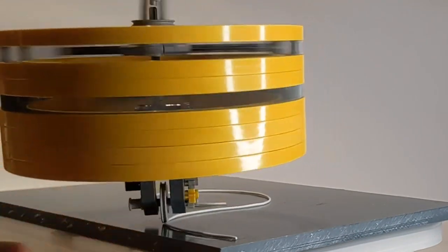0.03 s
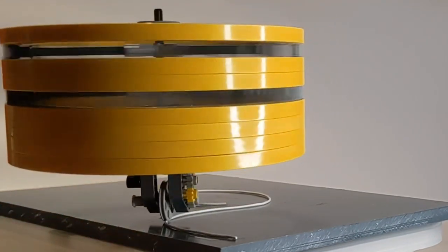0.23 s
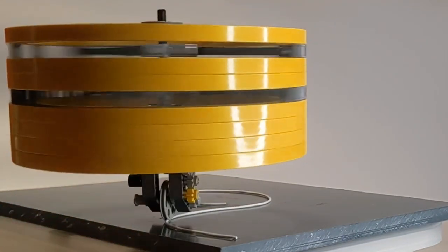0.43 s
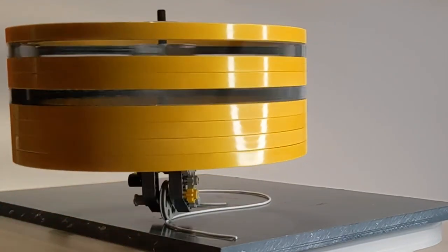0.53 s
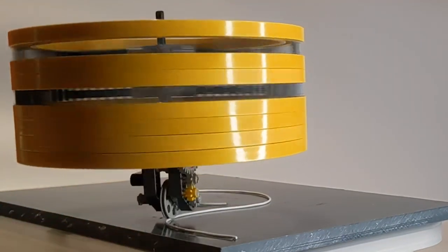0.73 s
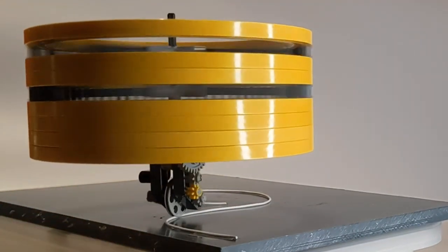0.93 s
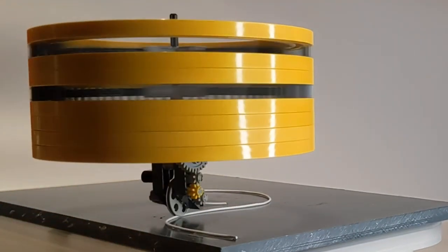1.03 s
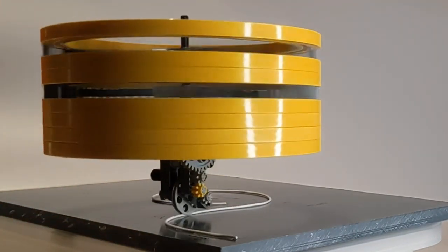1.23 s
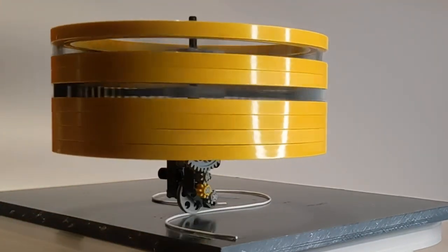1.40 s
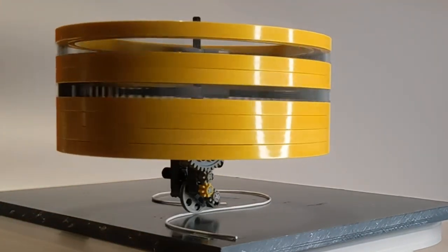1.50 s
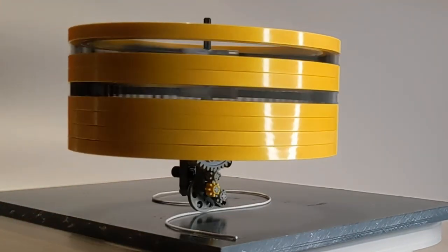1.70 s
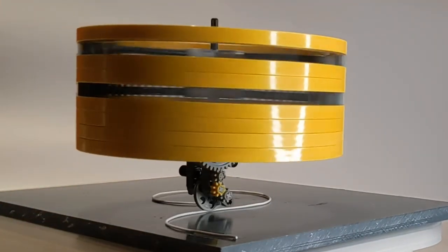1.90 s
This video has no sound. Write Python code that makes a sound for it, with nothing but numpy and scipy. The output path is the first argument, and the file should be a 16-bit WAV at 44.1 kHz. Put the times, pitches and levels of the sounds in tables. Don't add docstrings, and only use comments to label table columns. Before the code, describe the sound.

Close stereo pickup of a geared spinning toy, slightly left: faint hum, sudden sharp snap, dense gear chatter with hard clacks and dull board bumps, then a quick slowdown into tiny dry ticks in a quiet room.

```python
import sys
import numpy as np
from scipy import signal
from scipy.fft import rfft, irfft, next_fast_len
from scipy.io import wavfile
from scipy.ndimage import uniform_filter1d, map_coordinates

SR = 44100
rng = np.random.default_rng(int(sys.argv[2]) if len(sys.argv) > 2 else 0)


def pcm_store(signal):
    levels = np.round(np.clip(np.atleast_2d(signal), -1, 1) * 32767)
    wavfile.write(sys.argv[1], SR, levels.astype(np.int16).T)


def magnitude_from_level(level_db):
    exponent = np.asarray(level_db, float) / 20
    return 10 ** exponent


N = 85995
T = np.arange(N) / SR


def evened(x):
    return x / np.sqrt(np.mean(x ** 2) + 1e-20)


def read(points, hz):
    f, value = np.transpose(points)
    return np.interp(np.log(hz + 1), np.log(f + 1), value)


def curve(table, column):
    rows = np.array(table, float)
    return np.interp(T, rows[:, 0], rows[:, column])


def colour(x, points):
    size = next_fast_len(N + 4096)
    gain = magnitude_from_level(read(points, np.fft.rfftfreq(size, 1 / SR)))
    return irfft(rfft(x, size) * gain, size)[..., :N]


def ring(x, hz, width_hz):
    r = np.exp(-np.pi * width_hz / SR)
    poles = [1, -2 * r * np.cos(2 * np.pi * hz / SR), r * r]
    return signal.lfilter([(1 - r * r) / 2, 0, (r * r - 1) / 2], poles, x)


def wander(seconds):
    size = int(seconds * SR)
    return evened(uniform_filter1d(uniform_filter1d(rng.standard_normal(N), size), size))


def add(mix, start_s, sound):
    part = mix[..., round(start_s * SR):][..., :sound.shape[-1]]
    part += sound[..., :part.shape[-1]]


def partly_alike(a, b, same):
    return np.array([a, same * a + np.sqrt(1 - same ** 2) * b])


def pair(shape):
    a, b = rng.standard_normal((2, *shape))
    return partly_alike(a, b, 0.24)


# hz, level_db
FLOOR_COLOUR = [(15, -47), (25, -28), (352, -8.5), (449, -6.5), (1100, -14), (1390, -11), (1730, -9.5),
                (2390, -16.5), (15800, -53)]
# hz, likeness_0_to_1
FLOOR_SAME = [(30, 0.3), (150, 1), (400, 0.63), (1500, 0.043), (15000, 0.062)]


def floor():
    level_db = -62
    a, b = rfft(rng.standard_normal((2, N)))
    hz = np.fft.rfftfreq(N, 1 / SR)
    same = np.clip(read(FLOOR_SAME, hz), 0, 1)
    spectra = partly_alike(a, b, same) * magnitude_from_level(read(FLOOR_COLOUR, hz))
    return magnitude_from_level(level_db) * evened(irfft(spectra, N))


# mode_hz, width_hz, held_db, slowed_db
STAND_MODES = [(429, 110, -107, -66.5), (1360, 140, -77.5, -66.5), (1514, 70, -64.5, -83),
               (1612, 110, -71, -64.5), (2390, 97, -77, -71.5), (2950, 300, -64, -71),
               (5070, 260, -65, -80)]


def stand():
    flutter_db = 1.2
    slowed = np.clip((T - .3) / 1.3, 0, 1)
    out = 0
    for hz, width_hz, held_db, slowed_db in STAND_MODES:
        level_db = held_db + (slowed_db - held_db) * slowed + flutter_db * wander(0.016)
        band = ring(ring(pair((N,)), hz, width_hz), hz, width_hz)
        out = out + magnitude_from_level(level_db) * evened(band)
    return out


# line_hz, waver_hz, level_db
HUM_LINES = [(243.4, 5.93, -60.5), (515, 8.35, -62)]


def hum():
    end_s, fall_db_per_s, rest_db = 0.33, 172, -15.5
    fall_db = np.maximum(-fall_db_per_s * np.maximum(T - end_s, 0), rest_db)
    lines = 0
    for hz, waver_hz, db in HUM_LINES:
        level = magnitude_from_level(db + 1 + 1.8 * wander(.015))
        turns = np.cumsum(hz + waver_hz * wander(.012)) / SR
        lines = lines + level * np.sin(2 * np.pi * turns)
    return magnitude_from_level(fall_db) * lines


# time_s, level_db
RUMBLE = [(0, -48), (.36, -52.5), (.45, -53.5), (1.05, -54.5), (1.6, -56.5), (1.95, -60)]
# hz, level_db
BOARD_COLOUR = [(18, -51), (30, -15.5), (75, -12), (176, -14.5), (236, -8), (338, -13.5), (509, -20),
                (662, -25), (1500, -22.5), (1950, -85), (3300, -120)]
# mode_hz, width_hz, level_db
BOARD_MODES = [(79, 38, -15), (220, 78, 22)]


def rumble():
    shake = rng.standard_normal(N) * magnitude_from_level(1.84 * wander(0.0043))
    modes = sum(magnitude_from_level(db) * ring(shake, hz, width_hz) for hz, width_hz, db in BOARD_MODES)
    board = evened(modes) + magnitude_from_level(21) * evened(colour(shake, BOARD_COLOUR))
    return magnitude_from_level(curve(RUMBLE, column=1) - 5) * evened(board)


# start_s, peak_db, colour_centre_hz, damping_factor
BUMPS = [(.004, -42, 130, 1.1), (.236, -32, 1100, 1.1), (.263, -30, 240, .45), (.285, -42, 160, .9),
         (.489, -39, 300, 1.1), (.6805, -26, 900, 1.5), (.6885, -29.5, 520, 2.2), (.695, -36, 300, .8),
         (1.630, -39, 300, 1.2), (1.6365, -31, 520, 2.5), (1.645, -27, 400, 1.5), (1.645, -33, 1500, .9)]
# mode_hz, level_db, t60_s
BUMP_MODES = [(105, 1, 0.055), (175, 1, 0.051), (240, 0, 0.05), (320, -1.5, 0.03), (474, -2.5, 0.11),
              (600, 1, 0.028), (800, -1, 0.035), (980, -3, 0.025), (1275, -6, 0.12), (1390, -6, 0.2)]


def bumps():
    gain_db, rise_s, spread_octaves = -9.5, .0015, .75
    out, t = np.zeros(N), np.arange(8000) / SR
    phases = rng.random((len(BUMPS), len(BUMP_MODES)))
    for (start_s, peak_db, centre_hz, damping), turns in zip(BUMPS, phases):
        for (hz, mode_db, t60_s), turn in zip(BUMP_MODES, turns):
            away_db = 6 * (np.log2(hz / centre_hz) / spread_octaves) ** 2
            decay_db = 60 * t * damping / t60_s
            fade = magnitude_from_level(peak_db + gain_db + mode_db - away_db - decay_db) * np.minimum(t / rise_s, 1)
            add(out, start_s, fade * -np.sin(2 * np.pi * (hz * t + 0.42 * turn)))
    return out


# time_s, whirr_db, chatter_over_whirr_db, left_right_db, pinion_facing_db
RUN = [(0, -54.5, -4, 2, 15), (.217, -57, 1, 2.5, -1), (.2335, -43.5, 21, 6, -5),
       (.238, -38.5, 10.5, -0.5, 1), (.3, -41.5, 5.5, -1, -5), (.42, -41.5, 1.5, 1, 4),
       (.56, -42.5, 1.5, 1.5, -3.5), (.7, -42.5, 3.5, 1.5, -10), (.88, -42.5, -0.5, 1.5, 0.5),
       (.97, -40.5, -0.5, 7, 1.5), (1.1, -40.5, -2.5, 5, 7), (1.19, -42, -2.5, 4, 3),
       (1.36, -42.5, -0.5, 4.5, -7), (1.48, -47, 1, 1, -4), (1.53, -49, -5.5, 6, 6),
       (1.7, -53, -17, 6, -21), (1.82, -67.5, 8.5, 4, -11), (1.95, -67, -9, 4, 4)]
# hz, level_db
WHIRR_COLOUR = [(180, -31), (300, -11.5), (1010, -15.5), (2090, -3.5), (4190, -7), (6780, -6), (15800, -28)]


def whirr():
    hz, _, z = signal.stft(pair((N,)), SR, nperseg=256)
    patches = rng.standard_normal(z.shape[1:])
    patches = evened(uniform_filter1d(uniform_filter1d(patches, 4, 0), 8, 1))
    z = z * magnitude_from_level(read(WHIRR_COLOUR, hz)[:, None] + 2.14 * patches)
    hiss = signal.istft(z, SR, nperseg=256)[1][:, :N]
    return magnitude_from_level(curve(RUN, column=1) - 2 + 1.65 * wander(0.12)) * evened(hiss)


# mode_hz, width_hz, level_db
GEAR_MODES = [(2330, 680, -16), (3200, 470, -3), (5100, 610, 0), (6876, 198, 4), (9000, 670, -1),
              (10940, 780, -5.5), (13000, 1200, -11), (14500, 670, -17)]
PINION_EDGES_HZ = (4500, 5800, 8200, 9800)
# hz, level_db
CLACK_COLOUR = [(350, -49), (600, -9), (1170, -6.5), (2260, -25), (4310, -14), (5070, -2.5), (15800, -16.5)]


def gear_body(x, modes_db):
    dull_db = 7 * np.clip((T - 1.47) / .08, 0, 1)
    modes = 0
    for hz, width_hz, db in GEAR_MODES:
        in_pinion = np.searchsorted(PINION_EDGES_HZ, hz) % 2
        strike_db = curve(RUN, column=4) * in_pinion + 0.9 * wander(.03)
        level = magnitude_from_level(db - dull_db * abs(np.log2(hz / 5600)))
        modes = modes + level * ring(x * magnitude_from_level(strike_db), hz, width_hz)
    clack = colour(x, CLACK_COLOUR) * magnitude_from_level(-dull_db)
    input_rms = np.sqrt(np.mean(x ** 2))
    return input_rms * evened(magnitude_from_level(modes_db) * evened(modes) + magnitude_from_level(-3) * evened(clack))


def random_hits(per_s, spread_db, limit):
    strength = magnitude_from_level(spread_db * np.minimum(rng.exponential(1, N), limit))
    return strength * (rng.random(N) < per_s / SR)


def chatter():
    slap_ms, slap_db, grit_db, slack_db = 1.5, -9, -3, -6
    grit = random_hits(per_s=7000, spread_db=1.5, limit=4)
    slaps = random_hits(per_s=220, spread_db=0.6, limit=2.5) * (T > .275)
    bursts = signal.lfilter([1], [1, -np.exp(-1000 / slap_ms / SR)], slaps)
    envelope = magnitude_from_level(grit_db) * evened(grit) + magnitude_from_level(slap_db) * evened(bursts)
    drive = envelope * np.clip(pair((N,)), -2, 2)
    rim_db = -9 - 11 * abs(T - .35)
    rim = magnitude_from_level(rim_db) * evened(ring(drive, 3140, 780))
    level_db = curve(RUN, column=1) + curve(RUN, column=2)
    level_db = level_db + slack_db * (T < .2366)
    return (evened(gear_body(drive, modes_db=0.6)) + rim) * magnitude_from_level(level_db)


def blows(table, width_hz):
    rise_s = .0005
    whole, part, t = np.zeros((2, N)), np.zeros((2, N)), np.arange(1500) / SR
    for start_s, peak_db, ring_hz, length_ms in table:
        envelope = np.minimum(t / rise_s, 1) * np.exp(-t * 1000 / max(length_ms, 1))
        burst = magnitude_from_level(peak_db) * envelope * np.clip(pair(t.shape), -2, 2)
        add(whole, start_s, burst)
        add(part, start_s, ring(burst, ring_hz, width_hz))
    return whole, part


# start_s, peak_db, ring_hz, length_ms
SNAPS = [
    (.2274, -30, 3000, 2),
    (.2330, -34, 5500, 2),
    (.2364, -13, 10500, 1.3),
    (.2372, -15.5, 3600, 2.2),
    (.2385, -22, 8500, 1.5),
    (.2485, -30, 11000, 2),
    (.2520, -27, 5600, 3),
    (.2570, -17.5, 3500, 1.6),
]
# hz, level_db
SNAP_COLOUR = [(500, -36), (2500, -39), (4000, 3.5), (6500, 1.5), (11000, 3.5), (15800, -9)]


def snaps():
    whole, part = blows(SNAPS, 260)
    return magnitude_from_level(-3.5) * colour(whole, SNAP_COLOUR) + magnitude_from_level(11) * part


# start_s, peak_db, ring_hz, length_ms
KNOCKS = [(.344, -33, 3200, 2.1), (.351, -20.5, 6860, 3.4), (.364, -23, 3600, 3.3), (.380, -19, 7100, 2.5),
          (.396, -27, 5370, 4.5), (.409, -23, 5700, 2.5), (.453, -24.5, 3220, 10), (.496, -24.5, 5250, 4.3),
          (.534, -23, 3200, 3.8), (.540, -21.5, 4940, 4.6), (.543, -20, 11050, 3), (.549, -39, 4950, 2.2),
          (.603, -27, 5070, 3), (.623, -20, 3200, 1.9), (.641, -28, 10600, 1.6), (.692, -18, 10600, 1.16),
          (.700, -28, 7040, 4.7), (.751, -25, 7000, 4), (.767, -24.5, 2320, 3.6), (.784, -24, 3030, 4),
          (.809, -21.5, 9000, 2), (.817, -22.5, 2300, 3.8), (.871, -21.5, 9000, 1.9),
          (.882, -26.5, 3150, 3.3), (.948, -44, 7060, 3), (.962, -39, 5100, 3.3), (.980, -33, 5200, 11),
          (.988, -29, 9000, 2.2), (1.013, -25, 9700, 3.3), (1.068, -25, 7900, 5.1),
          (1.073, -23.5, 6850, 3.8), (1.078, -28, 9000, 4.3), (1.097, -26, 5200, 2.8),
          (1.11, -29, 6700, 11), (1.227, -25, 2840, 2.5), (1.247, -31, 5900, 3), (1.366, -32.5, 6800, 3),
          (1.451, -26, 5940, 5), (1.465, -24, 5940, 2.7), (1.473, -30, 7000, 3.8), (1.497, -36, 6900, 3),
          (1.567, -36, 2040, 3), (1.600, -33, 5100, 3.7), (1.621, -36, 5230, 4.3),
          (1.648, -33.5, 5650, 3.4), (1.715, -40, 5240, 4.5)]


def knocks():
    whole, part = blows(KNOCKS, 246)
    return magnitude_from_level(-8) * gear_body(whole, modes_db=22) + magnitude_from_level(8) * part


# start_s, peak_db, centre_hz
TICKS = [
    (1.7705, -48, 14100),
    (1.792, -34.5, 6960),
    (1.8365, -44, 5500),
]


def ticks():
    out, t = np.zeros(N), np.arange(400) / SR
    for start_s, peak_db, hz in TICKS:
        burst = rng.standard_normal(len(t)) * t / 0.00076 * np.exp(-t / 0.00085)
        add(out, start_s, magnitude_from_level(peak_db + 3) * ring(ring(burst, hz, 4500), hz, 3700))
    return out


# hz, t60_s
ROOM_T60 = [(200, 0.79), (2000, 0.31), (8000, 0.12), (15000, 0.033)]


def room(x):
    out, slots = np.zeros((2, N)), np.arange(60, SR // 3 - 20, 20)
    shape = (2, len(slots))
    for k in range(3):
        taps = np.zeros((2, SR // 3))
        at = slots + rng.integers(0, 20, shape)
        np.put_along_axis(taps, at, rng.choice([-1., 1.], shape), 1)
        hz, t, z = signal.stft(taps, SR, nperseg=128)
        decay_db = -60 * t / read(ROOM_T60, hz)[:, None]
        tail = signal.istft(z * magnitude_from_level(decay_db), SR, nperseg=128)[1]
        turn = np.sqrt(2 / 3) * np.cos(2 * np.pi * (T * 7 + k / 3))
        out += signal.fftconvolve((x * turn)[None], tail / np.linalg.norm(tail[0]), axes=1)[:, :N]
    return out


def late(x):
    lag_start_s, lag_end_s = 0.000249, 0.000471
    lag = SR * np.interp(T, [.3, 1.2], [lag_start_s, lag_end_s])
    return map_coordinates(x, [np.arange(N) - lag], order=5, mode="nearest")


def scene():
    gears = chatter() + knocks() + snaps() + ticks()
    hiss = whirr()
    low = bumps() + rumble() + hum()
    pan_db = curve(RUN, column=3)
    left = gears[0] * magnitude_from_level(pan_db * 0.51) + hiss[0] * magnitude_from_level(pan_db * 0.07 + 4.5)
    right = gears[1] * magnitude_from_level(-pan_db * 0.56 - 6) + hiss[1] * magnitude_from_level(-pan_db * 0.86 + 5.5)
    direct = np.array([left + low * magnitude_from_level(2.7), late(right) + np.roll(low, 8) * magnitude_from_level(1.3)])
    echoes = magnitude_from_level(-7.5) * room(gears[0] + hiss[0] + magnitude_from_level(-12.5) * low)
    return direct + echoes + floor() + stand()


def low_pass(x):
    return signal.sosfilt(signal.butter(12, 16520, fs=SR, output="sos"), x)


def record(dry):
    edge_hz = 15850
    x = signal.sosfilt(signal.butter(4, 40, "high", fs=SR, output="sos"), dry)
    lowpass = signal.firwin(511, edge_hz, window=("kaiser", 9), fs=SR)
    x = signal.oaconvolve(x, lowpass[None], "same")
    return low_pass(x)


dry = scene()
out = record(dry)
pcm_store(out)
```